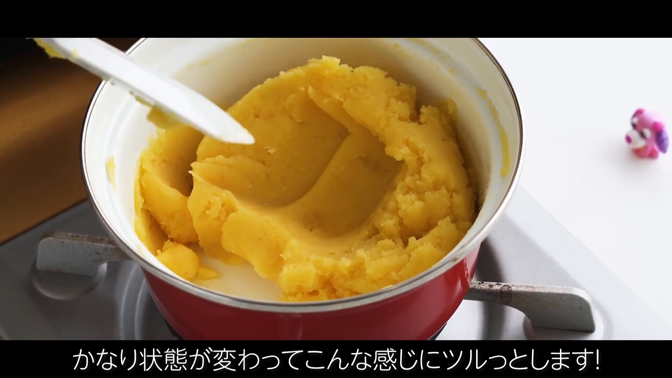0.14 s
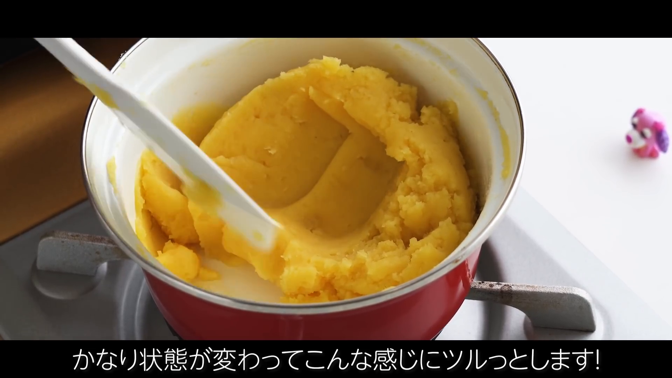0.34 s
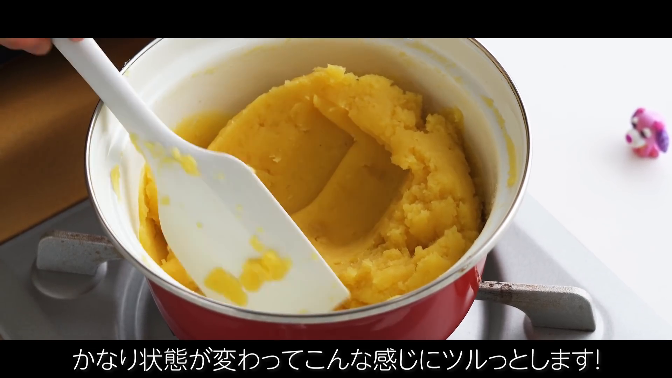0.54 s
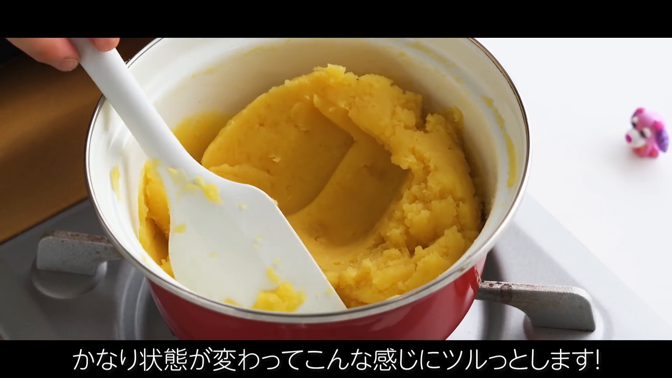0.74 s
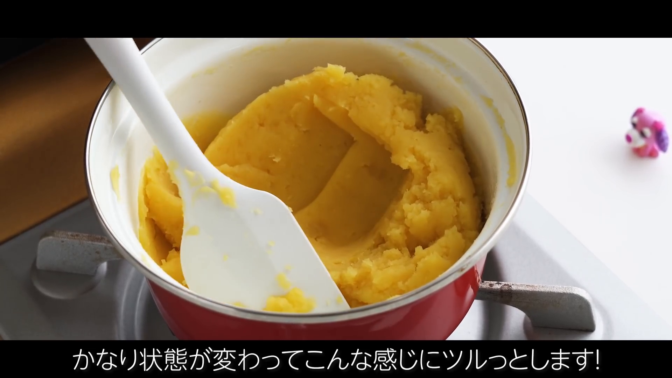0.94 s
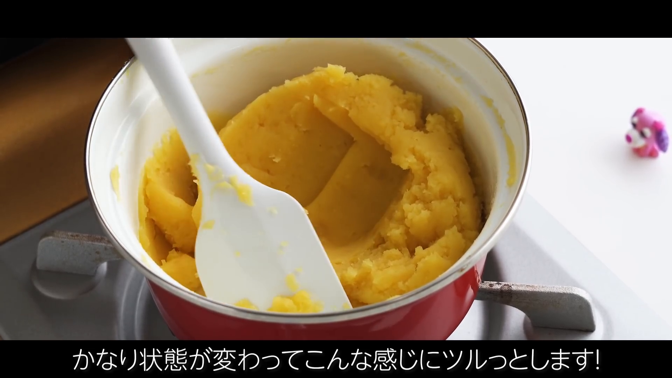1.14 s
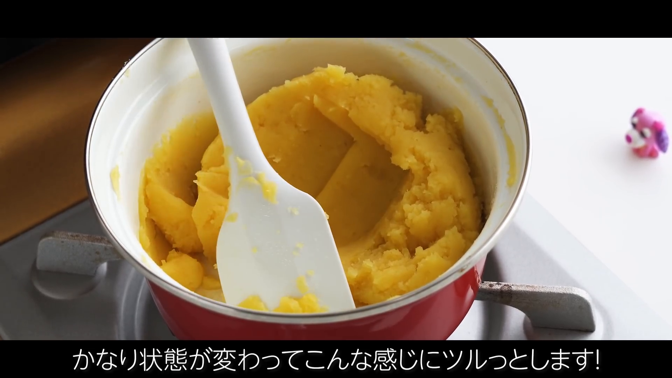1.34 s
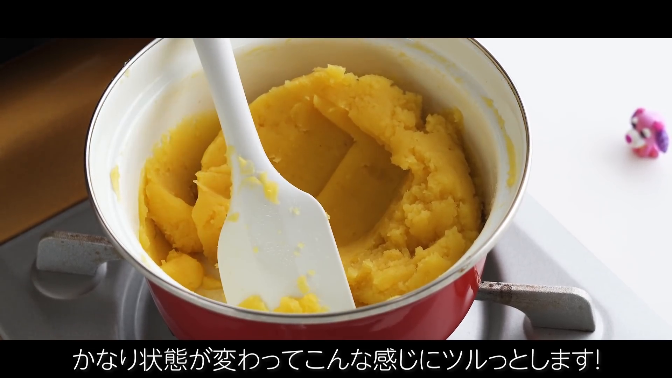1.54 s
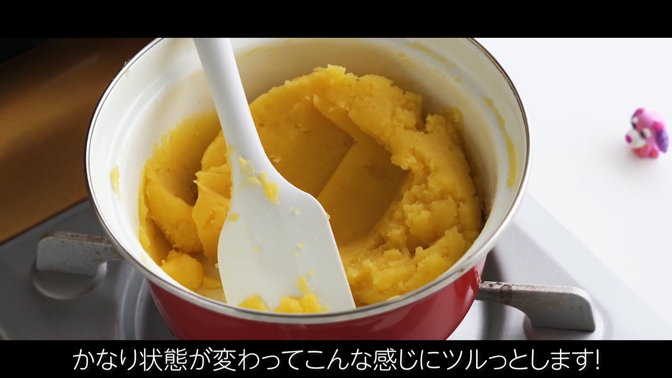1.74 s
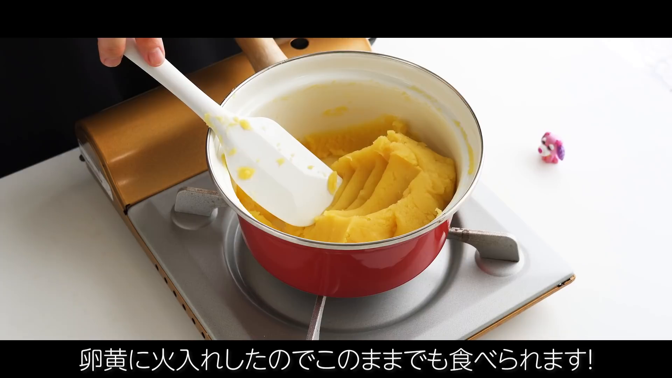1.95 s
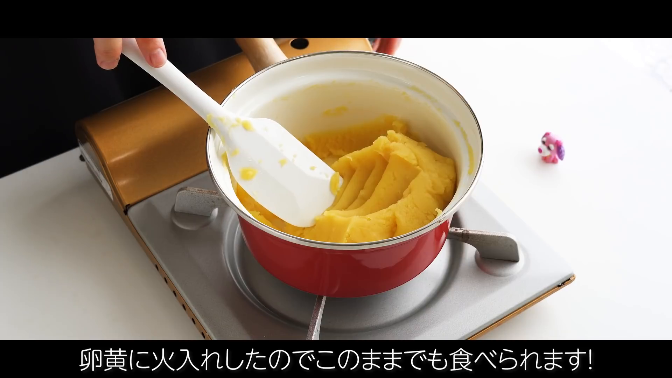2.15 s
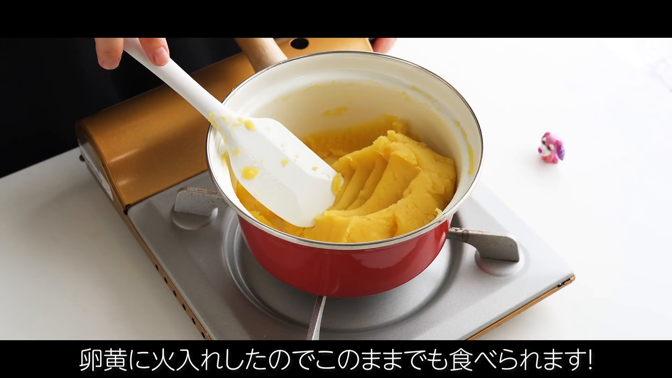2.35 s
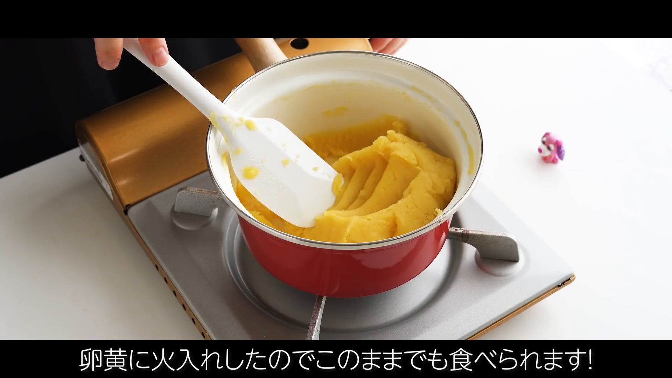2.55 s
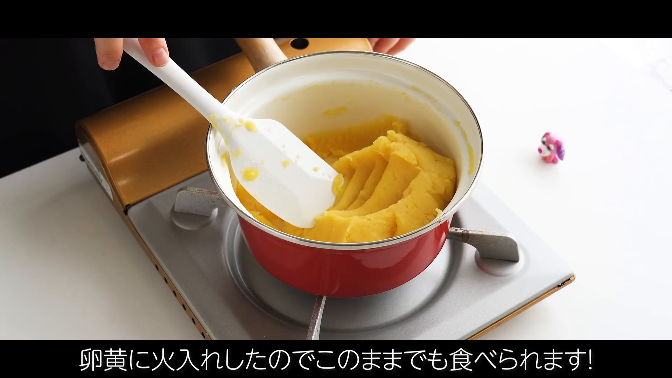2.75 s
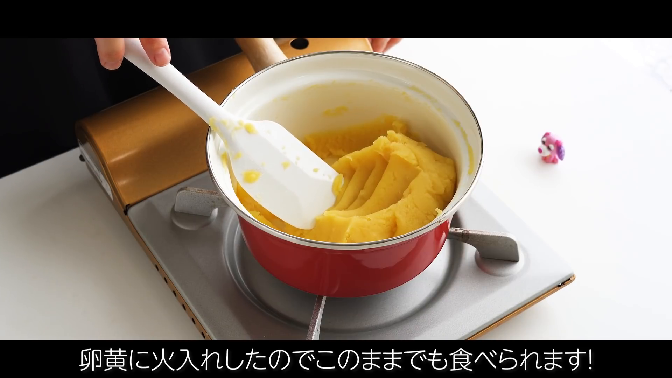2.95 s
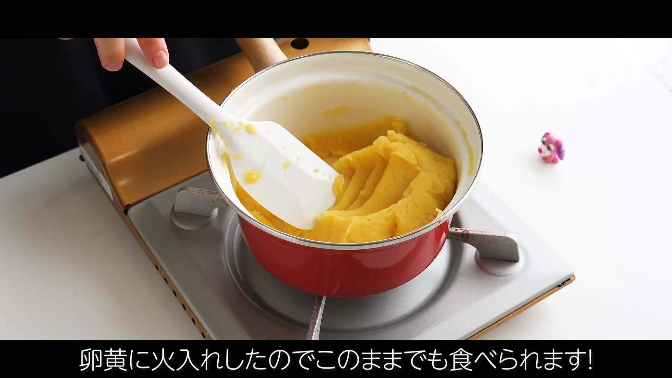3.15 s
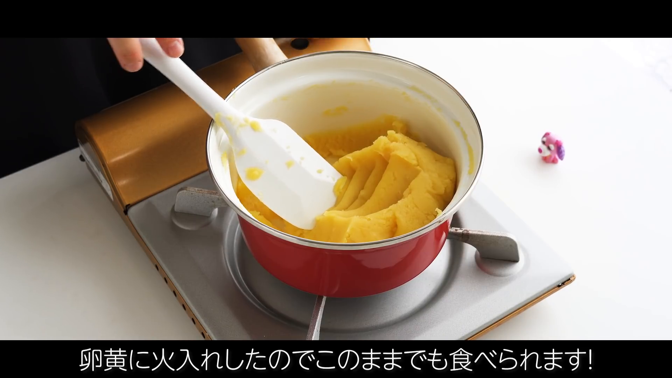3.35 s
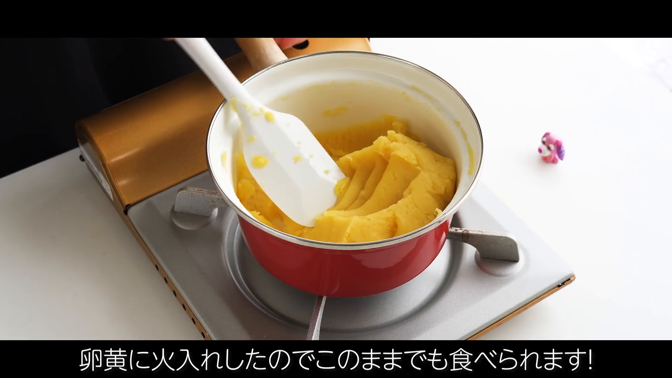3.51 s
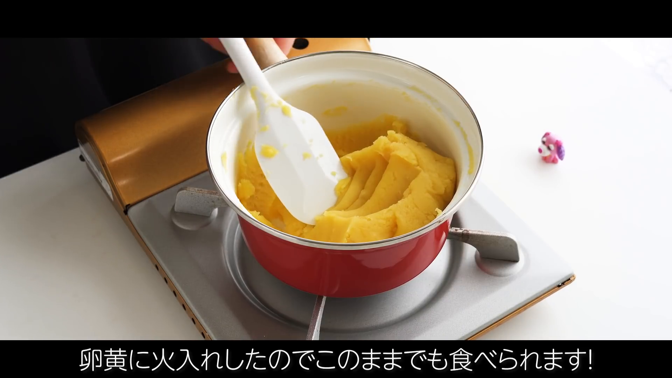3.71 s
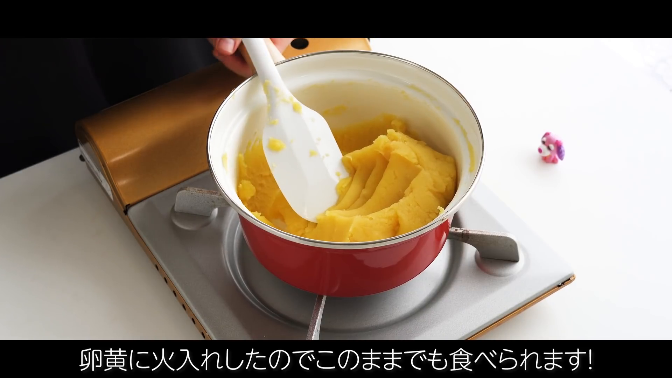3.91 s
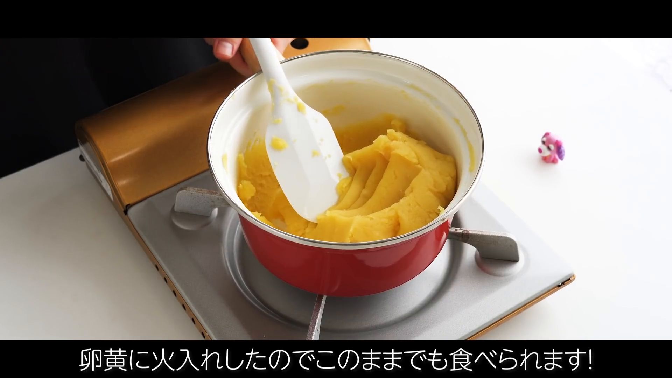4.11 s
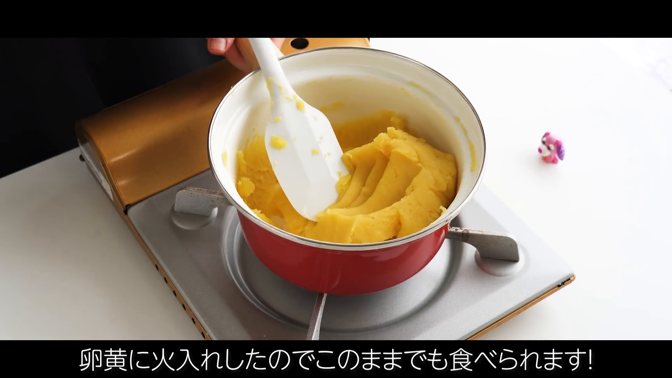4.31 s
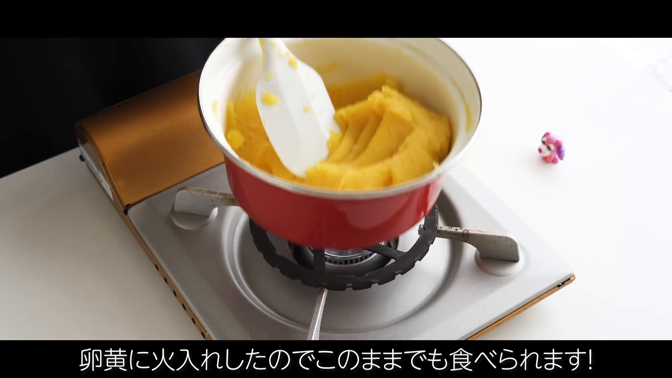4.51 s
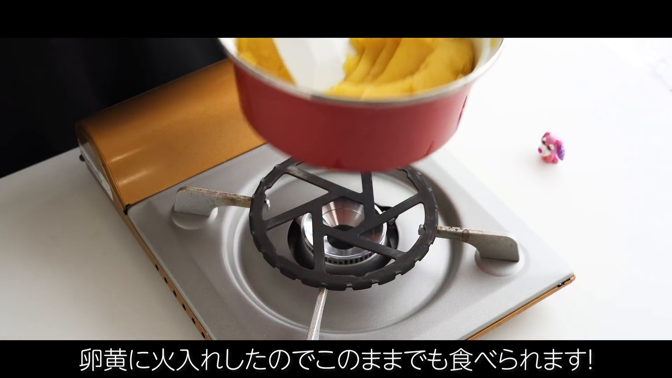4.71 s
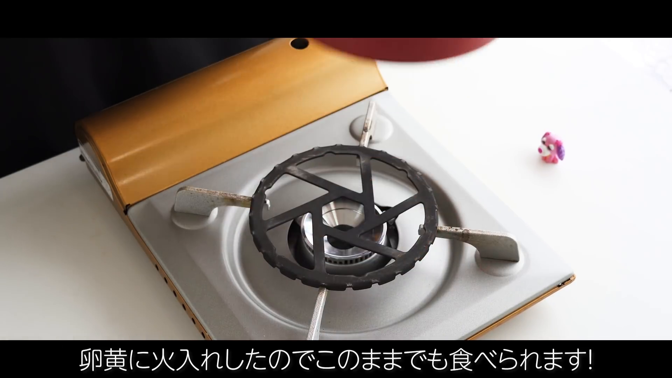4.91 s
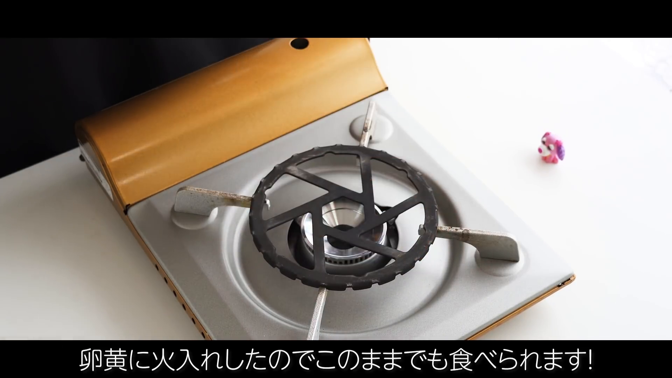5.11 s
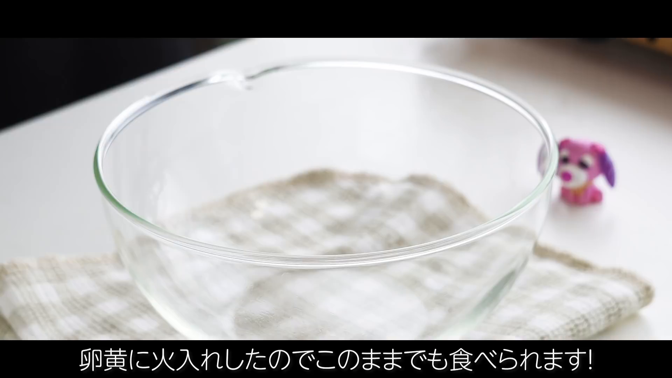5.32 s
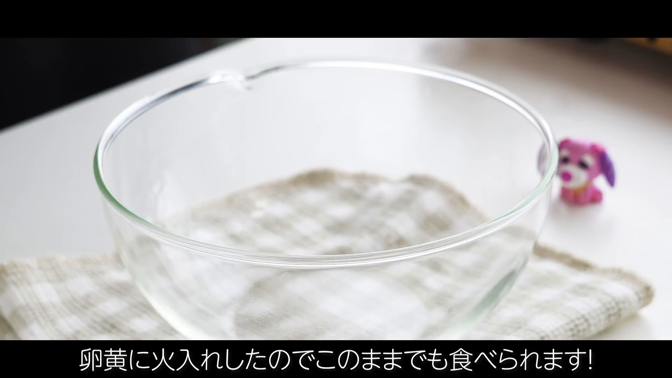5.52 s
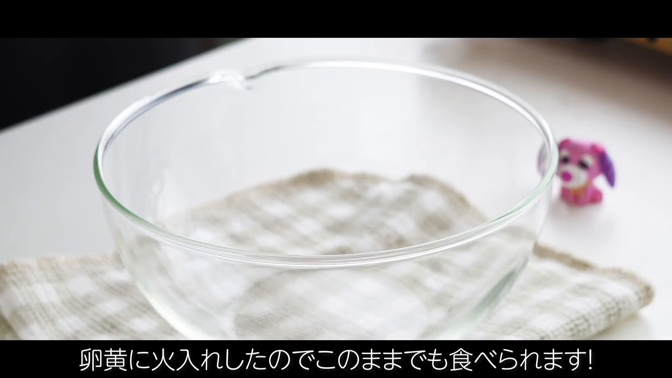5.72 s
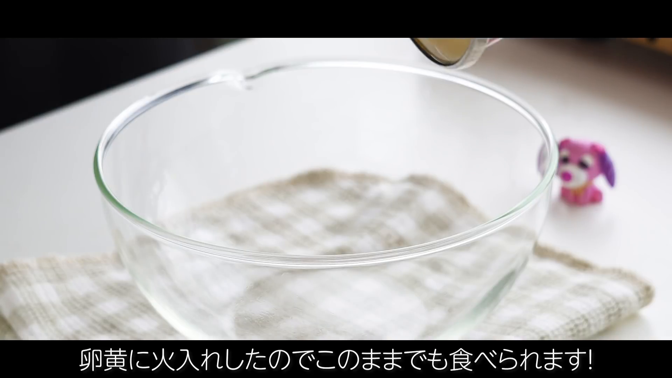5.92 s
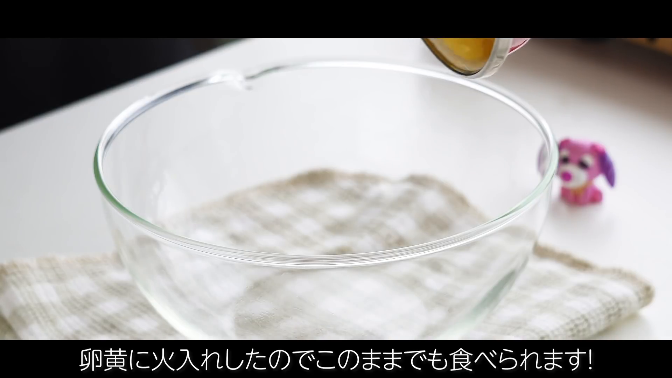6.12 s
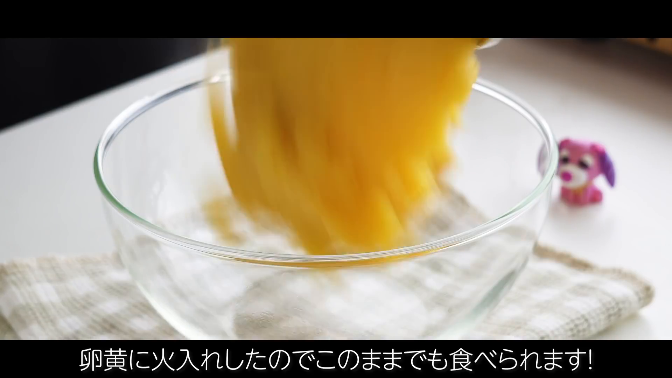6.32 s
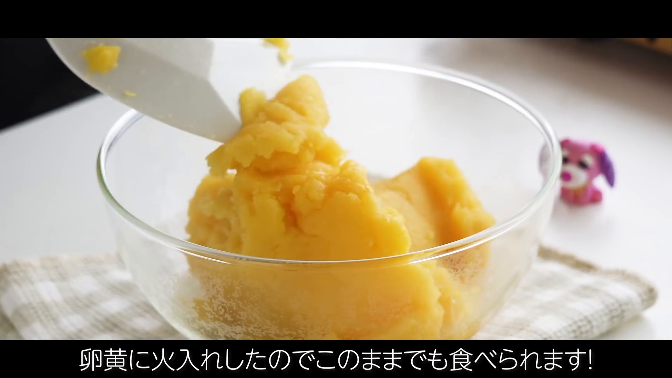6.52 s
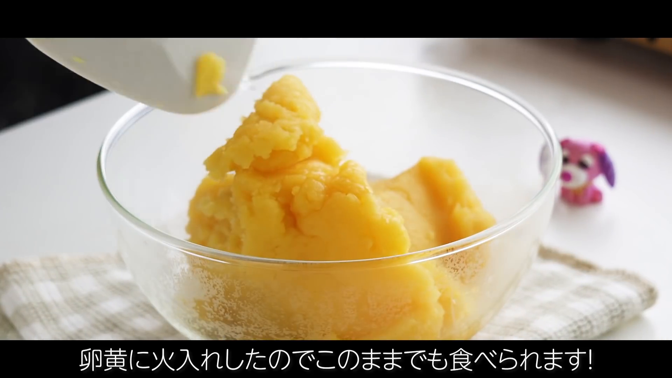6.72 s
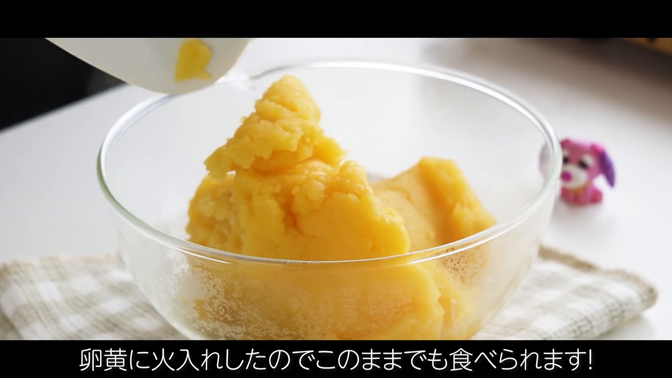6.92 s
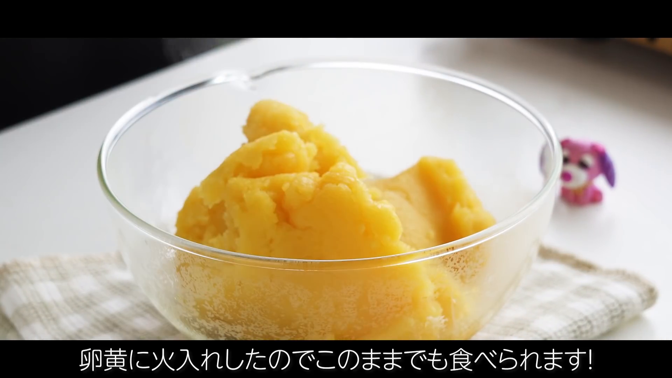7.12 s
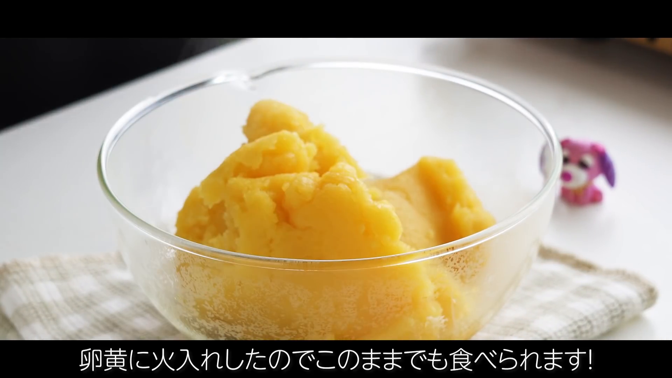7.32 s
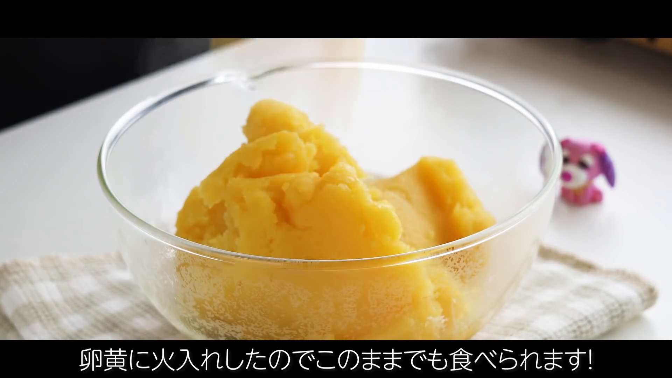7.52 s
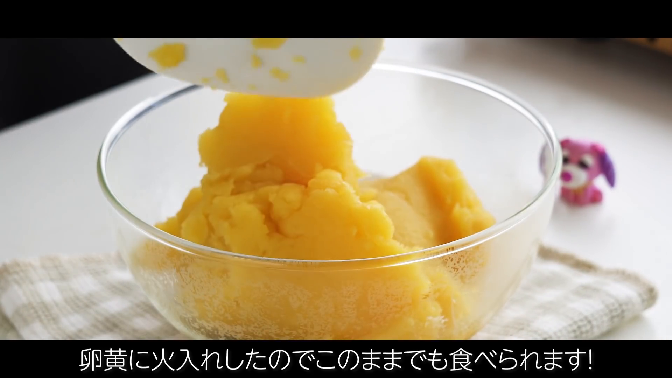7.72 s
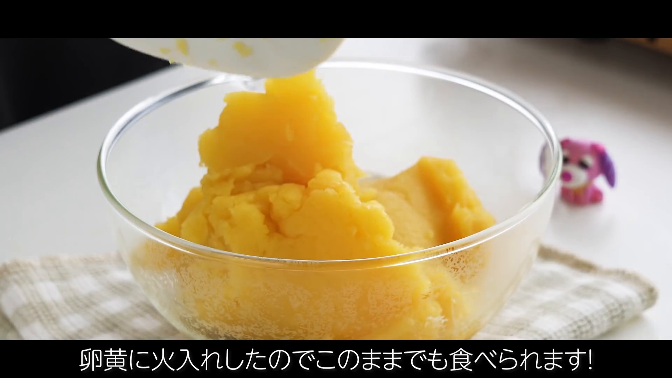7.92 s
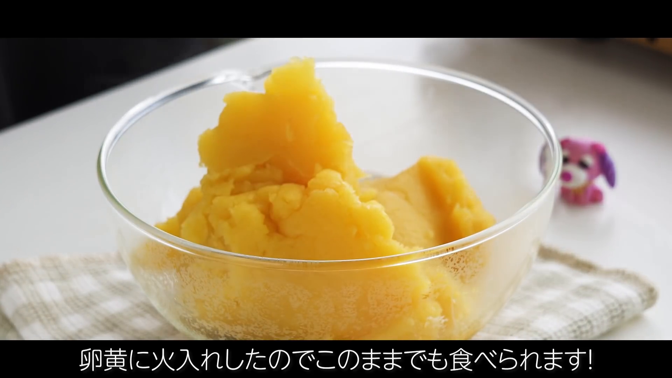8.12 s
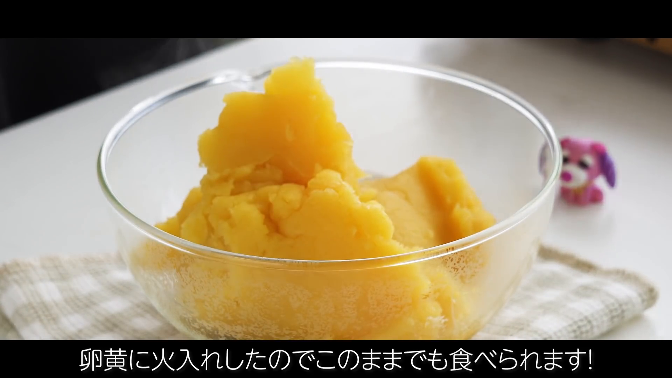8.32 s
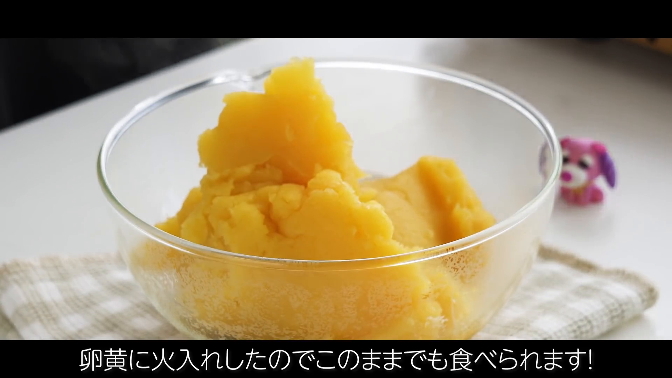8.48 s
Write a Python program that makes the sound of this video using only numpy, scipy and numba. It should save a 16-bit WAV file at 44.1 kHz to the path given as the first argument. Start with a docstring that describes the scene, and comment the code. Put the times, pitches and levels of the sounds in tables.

```python
"""Kitchen table, one channel, three set-ups joined by hard cuts over a quiet kitchen's hum and hiss.
Near the pot first: hot paste sizzles as dense noise grains, a spatula scrapes in duller grains, a few knocks
sound. Then wider: steam pops stand out, knocks rattle as noise and ring the pot's sine modes on its trivet; the
pot is lifted away and its wall shades the treble. Last, at the glass bowl: paste is pushed out with short sticky
noise bursts, then a lump lands with a squelch, slap and thump, and the spatula brushes the heap."""
import sys
import numpy as np
from scipy import signal
from scipy.fft import rfft, irfft, next_fast_len
from scipy.io import wavfile
from scipy.ndimage import uniform_filter1d
from numba import njit

SR = 44100
rng = np.random.default_rng(int(sys.argv[2]) if len(sys.argv) > 2 else 0)


def file_out(sig):
    """Save sig as 16-bit WAV at sys.argv[1]."""
    # one column per channel
    cols = np.atleast_2d(sig).T
    # limit, then scale
    lim = np.clip(cols, -1, 1)
    pcm = np.round(lim * 32767).astype(np.int16)
    wavfile.write(sys.argv[1], SR, pcm)


N = 377055

# start of each of the three set-ups, and the end: [t/s]
SETUP_TIMES = [0, 1.95, 5.352, 8.55]

# sizzle colour close to the pot: [f/Hz, relative level/dB per Hz]
NEAR_SIZZLE_COLOUR = [(180, -57), (300, -27), (420, -11), (488, -19), (522, -26), (577, -6), (660, -3),
                      (938, -1.5), (1290, -8), (2790, -7), (3840, -2.5), (7890, -16), (14700, -18.5),
                      (15700, -15), (16500, -34)]
# sizzle colour from further off: [f/Hz, relative level/dB per Hz]
WIDE_SIZZLE_COLOUR = [(180, -40), (300, 4), (392, -8), (441, -4.5), (607, -6), (938, -2), (1190, -7),
                      (1290, -4.5), (1830, -8), (2930, 0.5), (6560, -10), (10500, -13), (14200, -9.5),
                      (15700, -9), (16500, -31)]
# loudest steam pops: [t/s, level/dB, centre f/Hz]
STEAM_POPS = [(2.732, -47, 2920), (2.7771, -43, 3750), (2.955, -39, 3260), (2.984, -37, 3000),
              (3.754, -37.5, 2850), (3.918, -38.5, 2980), (4.0028, -37, 4000), (4.181, -46, 2850),
              (4.7142, -40, 3450), (5.0413, -40, 3010), (5.076, -37, 2950), (5.15, -38.5, 3600),
              (5.168, -41, 3400), (5.267, -33.5, 3940)]
# sizzle (before its filters) and pot-mouth resonance, near and wide set-up: [level/dB]
SIZZLE_DB, MOUTH_DB = [-50.5, -50], [-82, -65.5]
# the pot is carried off from LIFT_S and its wall hides more and more of the treble
LIFT_S, OPEN_HZ, SHADE_HZ_PER_S = 4.79, 17300, 14400

# dull grains: spatula scrape, swelling at 2.91 and 3.18 s as tails of the knocks; one path for each of
# the first two set-ups: [t/s, level/dB before it wavers]
DULL_GRAIN_PATHS = [
    [(0.0, -64), (0.362, -68), (0.558, -55.5), (1.02, -70.5), (1.95, -65)],
    [(1.95, -53), (2.58, -56), (2.91, -46.5), (3.02, -59), (3.18, -42), (3.29, -56.5), (3.42, -57.5),
     (3.69, -54), (4.18, -57), (5.19, -55), (5.352, -58.5)],
]

# modes of the loaded pot on trivet and stove: [f/Hz, relative level/dB, t60/s]
POT_MODES = [(108, -2, .2), (188, 2, .2), (205, 0, .25), (324, -4, .25), (367, 2, .45), (446, 2, .32),
             (600, -6, .13), (635, -4, .25), (708, -2, .2), (820, -4, .18), (960, -3, .12), (996, -4, .18),
             (1108, 0, .16), (1175, -6, .3), (1235, -1.5, .34), (1255, -5, .3), (1340, -6, .24),
             (1385, -10, .2), (1755, -10, .2), (1845, -8, .2), (2005, -8, .18), (2075, -8, .13),
             (2190, -8, .13), (2420, -8, .18)]
# knocks of pot on trivet: [t/s, clank level/dB, clank f/Hz, thud level/dB, thud f/Hz, crack level/dB,
# crack f/Hz, fizz level/dB, factor on each mode's ring time: below 1 shorter, above 1 longer]
TRIVET_KNOCKS = [(0.19, -77, 1260, -63.5, 331, -64, 3250, -60, 0.48),
                 (0.622, -47, 684, -40.5, 199, -43, 1600, -64, 1.16),
                 (0.643, -44.5, 644, -49.5, 398, -51, 3700, -62, 0.9),
                 (1.857, -68, 719, -60, 443, -49, 3540, -58, 0.74),
                 (2.213, -44.5, 1180, -50.5, 361, -40.5, 4550, -57, 0.27),
                 (2.307, -65, 999, -56, 215, -49, 2270, -60, .7),
                 (2.389, -45.5, 1110, -68, 296, -52, 2250, -53, 0.7),
                 (2.43, -35, 1220, -52.5, 443, -41, 2190, -51, 0.61),
                 (2.459, -38.5, 1180, -50, 237, -48, 3220, -59, 0.39),
                 (2.538, -38, 960, -69, 153, -46, 2220, -61, 0.51),
                 (2.589, -39.5, 1250, -49, 450, -45, 3490, -59, 0.82),
                 (2.652, -32, 1070, -45, 464, -36, 2300, -54, 0.63),
                 (2.797, -43.5, 830, -55.5, 178, -44.5, 3150, -53, 0.78),
                 (2.857, -37.5, 970, -55.5, 186, -24.5, 3270, -31.5, 0.65),
                 (2.897, -32.5, 900, -43.5, 317, -27.5, 3230, -41, 0.51),
                 (3.085, -45, 1000, -51, 183, -31, 2440, -26, 0.84),
                 (3.104, -36, 980, -50.5, 498, -34.5, 2300, -54, 0.56),
                 (3.127, -25, 1220, -48.5, 474, -21, 3400, -46, 0.88),
                 (3.149, -26.5, 1270, -41.5, 474, -24, 2580, -46, 0.81),
                 (3.351, -28, 850, -36, 220, -37, 2880, -39.5, 0.93),
                 (3.374, -44, 710, -39.5, 302, -52, 2990, -39.5, 0.88),
                 (3.442, -42.5, 725, -57, 371, -39.5, 3020, -51, 0.53),
                 (4.284, -53, 848, -46, 194, -58, 2900, -68, 0.67),
                 (4.317, -53.5, 1180, -47, 308, -64, 3300, -58, 0.58),
                 (4.834, -54, 1500, -64, 205, -49, 2370, -54, 0.49),
                 (4.885, -53, 1500, -61, 220, -49, 2200, -58, 0.54),
                 (4.973, -52, 719, -54, 221, -47, 3140, -51, 0.49)]
# of the clank; crack and fizz scale from both, the thud only in its decay
RATTLE_T60_S, KNOCK_RISE_S = 0.08, 0.0022
RING_DB, CLANK_OCTAVES = -3, 0.7  # clank ring against its rattle; reach of the blow over the modes

# wet smacks of paste letting go or landing: [t/s, snap level/dB, snap f/Hz, low level/dB, low f/Hz,
# treble level/dB]
PASTE_SMACKS = [(5.3695, -45, 4190, -52, 1950, -63), (5.474, -55, 3670, -51, 1830, -66),
                (5.701, -48, 3820, -69, 810, -55), (5.7124, -60, 3930, -68, 1390, -54),
                (5.7428, -41.5, 4060, -65, 869, -53), (5.751, -48, 4300, -66, 703, -48),
                (5.877, -45.5, 3800, -53, 1840, -53), (5.975, -48.5, 3830, -69, 1580, -57),
                (5.987, -56, 4010, -71, 1020, -50), (6.0729, -35, 3650, -48, 1850, -54),
                (6.109, -52, 3980, -52, 1940, -53), (6.1863, -49, 4360, -58, 1590, -50),
                (6.196, -46, 3910, -53, 1710, -45), (6.206, -44, 4340, -49, 1640, -61),
                (6.2881, -52, 3960, -69, 1880, -71), (6.3973, -42, 4050, -46, 2300, -46),
                (6.455, -37, 3820, -39, 1270, -46), (6.4603, -18, 3560, -28, 1280, -37),
                (6.4744, -18.5, 3380, -18.5, 1380, -32), (6.4808, -28, 3750, -37, 2290, -39),
                (6.5027, -43, 3840, -26.5, 820, -49), (6.5614, -50, 3530, -41, 993, -58),
                (6.5859, -49, 2550, -43, 1300, -63), (6.6105, -49, 4000, -41, 1050, -55),
                (6.6353, -53, 3520, -50, 1610, -57), (6.6404, -48, 4060, -42, 985, -53),
                (6.775, -46, 4800, -44.5, 1320, -62), (7.0394, -57, 4820, -53, 797, -66),
                (7.6265, -48, 3170, -47, 1280, -58), (7.645, -51, 3680, -47, 1750, -47),
                (7.7056, -46, 2900, -32, 1250, -46)]
SMACK_T60_S, SMACK_RISE_S, SMACK_TREBLE_HZ = 0.017, 0.002, 7760
# faint smacks strewn between the loud ones: window, lower level and factor for the louder ones
CRACKLE_START_S, CRACKLE_END_S, CRACKLE_BASE_DB, CRACKLE_SPREAD = 5.6, 6.7, -66, 4.5
# the lump lands, spreads in the bowl, then settles
LAND_S, SPREAD_S, LAND_RISE_DB_S = 6.46, 0.056, 900
SPREAD_FALL_DB_S, SQUELCH_SETTLE_DB_S, SETTLE_DB_S = 71, 128, 257
SQUELCH_DB, SLAP_DB, THUMP_DB, DEEP_THUMP_DB = -41, -39, -38, -56
# wet hiss dies after the cut, swells as the lump tears loose and as the spatula brushes the heap:
# [peak t/s, level around 4 kHz/dB, treble level/dB, rise/dB per s, fall/dB per s]
WET_HISS_SWELLS = [(5.352, -75, -78, 904, 86), (6.4, -59.5, -58.5, 130, 70), (7.63, -63.5, -66, 293, 200)]
# steady wet hiss while paste leaves the pot: [level/dB]
FIZZ_FLOOR_DB, TREBLE_FLOOR_DB = -74, -75

ROOM_T60_S, ROOM_DB = 0.22, -10
# kitchen hum and microphone hiss: [f/Hz, relative level/dB per Hz]
KITCHEN_COLOUR = [(15, -42), (25, -16), (80, -9), (111, -5.5), (172, -7), (226, 1), (273, -14),
                  (553, -22.5), (600, -25), (669, -23), (726, -25), (979, -26), (2460, -31), (14400, -37),
                  (16500, -39.5)]
# upper part of the kitchen noise in each set-up: [level/dB]
SETUP_HISS_DB = [-69.5, -63, -64]
# steady lowest part of the hum in each set-up: [level/dB]
SETUP_DEEP_DB = [-80, -72.5, -74.5]
# hum near 220 Hz and rumble under 140 Hz in each set-up, before they waver: [level/dB]
HUM_DB, RUMBLE_DB = [-70, -57, -61], [-77, -68, -67]
# hands bump pot and table: [t/s, rumble level/dB, hum level/dB before it wavers]
HAND_BUMPS = [(0.418, -59.5, -66), (0.615, -51, -50.5), (1.551, -76, -64.5), (1.769, -77, -67),
              (2.224, -58, -72), (2.92, -46.5, -51), (3.13, -54.5, -51), (3.37, -48.5, -48),
              (3.65, -56, -59), (4.01, -64, -57), (4.17, -58, -55), (4.34, -51.5, -49), (4.44, -55.5, -59),
              (4.81, -64, -62), (4.97, -72, -49), (5.12, -59, -53), (5.442, -67, -53), (6.62, -67, -47.5),
              (6.78, -71, -47.5), (6.964, -70, -55), (7.3, -68, -60), (7.63, -58, -68)]
BUMP_RISE_DB_S, BUMP_FALL_DB_S = 143, 132
TOP_HZ = 15850  # upper edge of the recorder's band


def sizzle():
    """Steam under the paste bursts in dense grains, resonates in the pot mouth and pops at times."""
    t = np.arange(N) / SR
    steam = grains(2500, 2.9, 0.94)
    near = colour(steam, NEAR_SIZZLE_COLOUR)
    wide = colour(steam, WIDE_SIZZLE_COLOUR)
    fry = np.where(t < SETUP_TIMES[1], near, wide)
    fry = butter_filter(fry, 2, 1600, "high")
    edge_hz = np.clip(OPEN_HZ - SHADE_HZ_PER_S * np.maximum(t - LIFT_S, 0), 3000, .4 * SR)
    fry = shade(shade(fry, edge_hz), 1.2 * edge_hz)
    out = fry * by_setup(SIZZLE_DB) * undb(0.82 * walk(14))
    mouth = unit(band(steam, 3430, 4530))
    out += mouth * by_setup(MOUTH_DB) * undb(4.0 * walk(4.24))
    for s, db, hz in STEAM_POPS:
        add(out, s, undb(db) * burst(0.61 * hz, 1.26 * hz, 0.01))
    return out


def dull_grains():
    """Sparser grains in a dull band: the spatula scrapes the pot floor, and knocks leave grainy tails."""
    t = np.arange(N) / SR
    dull = colour(grains(700, 3, 2.0), WIDE_SIZZLE_COLOUR)
    dull = unit(band(dull, 315, 1800))
    gain = np.zeros(N)
    for path in DULL_GRAIN_PATHS:
        s, db = np.transpose(path)
        gain += undb(np.interp(t, s, db)) * ((t >= s[0]) & (t <= s[-1]))
    return dull * gain * undb(0.56 * walk(4.7))


def knocks():
    """Each knock rattles briefly and rings the pot; the thud rings its low modes."""
    out, t = np.zeros(N), np.arange(13230) / SR
    t60, rise_s = RATTLE_T60_S, KNOCK_RISE_S
    clank_rise = np.minimum(t / rise_s, 1)
    thud_rise = np.minimum(t / 0.011, 1)
    for s, clank_db, clank_hz, thud_db, thud_hz, crack_db, crack_hz, fizz_db, ring_factor in TRIVET_KNOCKS:
        rattle = burst(0.51 * clank_hz, 1.7 * clank_hz, t60, 4.1, rise_s)
        clank_ring = clank_rise * ring(clank_hz, CLANK_OCTAVES, ring_factor, t)
        add(out, s, undb(clank_db) * (rattle + undb(RING_DB) * clank_ring))
        thud = burst(113, 560, 1.83 * t60, 0.98, 0.0017)
        thud_ring = thud_rise * ring(thud_hz, 0.61, ring_factor, t)
        add(out, s, undb(thud_db) * (thud + undb(4.0) * thud_ring))
        crack = burst(0.69 * crack_hz, 1.44 * crack_hz, 0.68 * t60, 4.2, rise_s)
        add(out, s, undb(crack_db) * crack)
        fizz = burst(5300, 20000, 0.47 * t60, 2.3, 0.37 * rise_s)
        add(out, s, undb(fizz_db) * fizz)
    return out


def ring(centre_hz, octaves, ring_factor, t):
    """The modes near the struck pitch speak loudest; every blow mixes them anew."""
    hz, db, t60 = np.transpose(POT_MODES)[:, :, None]
    level_chance, tuning_chance, phase_chance = rng.standard_normal((3, len(POT_MODES), 1))
    db = db - 12 * (np.log2(hz / centre_hz) / octaves) ** 2 + 2.5 * level_chance
    decay = undb(db - 60 * t / (ring_factor * t60))
    tuned_hz = hz * (1 + 0.0013 * tuning_chance)
    return (decay * np.sin(2 * np.pi * tuned_hz * t + 2 * phase_chance)).sum(axis=0)


def paste_smacks():
    """Sticky paste tears or lands in short wet smacks, with fainter ones crackling at random between."""
    out = np.zeros(N)
    for s, *parts in PASTE_SMACKS:
        add(out, s, smack(*parts))
    for when, size, pitch in rng.random(size=(36, 3)):
        s = CRACKLE_START_S + when * (CRACKLE_END_S - CRACKLE_START_S)
        db = CRACKLE_BASE_DB - CRACKLE_SPREAD * np.log(size + .05)
        add(out, s, smack(db, 3500 + 1200 * pitch, db - 12, 1500, db + 8 * (pitch - .5)))
    return out


def smack(snap_db, snap_hz, low_db, low_hz, treble_db):
    """One wet tear: a snap, a lower pat and a spit of treble."""
    parts = [(snap_db, 0.84 * snap_hz, 1.19 * snap_hz), (low_db, 0.4 * low_hz, 1.5 * low_hz),
             (treble_db, 0.46 * SMACK_TREBLE_HZ, 2.0 * SMACK_TREBLE_HZ)]
    return sum(undb(db) * burst(lo, hi, SMACK_T60_S, rise_s=SMACK_RISE_S, size=2700)
               for db, lo, hi in parts)


def lump_landing():
    """The lump hits the bowl: grainy squelch and slap, with noise thumps that hold while it spreads."""
    spread_over = np.maximum(np.arange(N) / SR - LAND_S - SPREAD_S, 0)
    squelch_gain = swell(LAND_S, LAND_RISE_DB_S, SPREAD_FALL_DB_S) * undb(-SQUELCH_SETTLE_DB_S * spread_over)
    body_gain = swell(LAND_S, LAND_RISE_DB_S, 5.0) * undb(-SETTLE_DB_S * spread_over)
    wet = grains(1200, 4.6, -1.6)
    squelch = unit(band(wet, 240, 3300)) * undb(SQUELCH_DB)
    slap = unit(band(wet, 97, 700)) * undb(SLAP_DB)
    thump = unit(band(rng.standard_normal(N), 94, 155)) * undb(THUMP_DB)
    deep_thump = unit(band(rng.standard_normal(N), 35, 80)) * undb(DEEP_THUMP_DB)
    return squelch * squelch_gain + (slap + thump + deep_thump) * body_gain


def wet_hiss():
    """The last sizzle of the paste: fine grains near 4 kHz and above, on a floor with slow swells."""
    t = np.arange(N) / SR
    leaving_pot = (t > SETUP_TIMES[2]) & (t < LAND_S)
    fizz_gain = undb(FIZZ_FLOOR_DB) * leaving_pot
    treble_gain = undb(TREBLE_FLOOR_DB) * leaving_pot
    for s, fizz_db, treble_db, rise_db_s, fall_db_s in WET_HISS_SWELLS:
        shape = swell(s, rise_db_s, fall_db_s)
        fizz_gain = fizz_gain + undb(fizz_db) * shape
        treble_gain = treble_gain + undb(treble_db) * shape
    steam = grains(1700, 4.2, 2.6)
    fizz = unit(band(steam, 3650, 4550, order=1))
    treble = unit(band(steam, 3600, 14000))
    return fizz * fizz_gain + treble * treble_gain


def room(source):
    """The walls answer after 4 ms with a dull, dense tail of decaying noise."""
    t = np.arange(int(.4 * SR)) / SR
    tail = band(rng.standard_normal(len(t)), 130, 8600, order=1) * undb(-60 * t / ROOM_T60_S) * (t > .004)
    return undb(ROOM_DB) * signal.fftconvolve(source, tail / np.sqrt(np.sum(tail ** 2)))[:N]


def kitchen():
    """One noise split in bands: wavering hum and rumble raised by bumps, steady deep part and hiss."""
    air = colour(rng.standard_normal(N), KITCHEN_COLOUR)
    hum_power = by_setup(HUM_DB) ** 2
    rumble_power = (by_setup(RUMBLE_DB) * undb(5 * walk(4.9))) ** 2
    for s, rumble_db, hum_db in HAND_BUMPS:
        bump = swell(s, BUMP_RISE_DB_S, BUMP_FALL_DB_S)
        hum_power = hum_power + (undb(hum_db) * bump) ** 2
        rumble_power = rumble_power + (undb(rumble_db) * bump) ** 2
    hum = unit(band(air, 164, 323, order=3)) * np.sqrt(hum_power) * undb(3.1 * walk(10))
    rumble = unit(band(air, 85, 144, order=3)) * np.sqrt(rumble_power)
    deep = unit(butter_filter(air, 4, 140, "low")) * by_setup(SETUP_DEEP_DB)
    hiss = unit(butter_filter(air, 4, 350, "high")) * by_setup(SETUP_HISS_DB)
    return hum + rumble + deep + hiss


def grains(rate, spread_db, wash_db):
    """Tiny noise bursts, rate per second, of very unequal size over a smooth wash."""
    sizes = undb(spread_db * np.minimum(rng.exponential(size=N), 5))
    clicks = (rng.random(N) < rate / SR) * sizes
    smear = np.exp(-np.arange(80) / 20.0)
    bursts = unit(np.convolve(clicks, smear)[:N] * rng.standard_normal(N))
    return bursts + undb(wash_db) * rng.standard_normal(N)


def burst(lo_hz, hi_hz, t60, lumpy=0., rise_s=0.00014, size=13230):
    """Band noise of rms 1 under a fast rise and a decay; lumps are small bounces."""
    t = np.arange(size) / SR
    # a new random level every 90 samples, joined by ramps
    lumps = undb(lumpy * uniform_filter1d(np.repeat(rng.standard_normal(size // 90), 90), 90))
    shape = np.minimum(t / rise_s, 1) * undb(-60 * t / t60)
    return unit(band(rng.standard_normal(size), lo_hz, hi_hz)) * lumps * shape


def swell(s, rise_db_s, fall_db_s):
    """Gain that climbs to 1 at time s and falls away."""
    late = np.arange(N) / SR - s
    return undb(np.where(late < 0, rise_db_s, -fall_db_s) * late)


def walk(rate):
    """Slow random wander: levels held 1 / rate s and smoothed twice; spread about a third."""
    k = int(SR / rate)
    held = np.repeat(rng.standard_normal(N // k + 1), k)
    return 0.47 * uniform_filter1d(uniform_filter1d(held, k), k)[:N]


def by_setup(levels_db):
    """One gain for each set-up; silent where none is given."""
    gains = np.append(undb(levels_db), np.zeros(3))
    setup = np.searchsorted(SETUP_TIMES, np.arange(N) / SR) - 1
    return gains[np.clip(setup, 0, 2)]


@njit
def shade(x, hz):
    """State-variable low-pass with a moving edge."""
    y, b, l = np.empty(len(x)), 0., 0.  # b and l: band and low states
    for i in range(len(x)):
        g = np.tan(np.pi * hz[i] / SR)
        v = (b + g * (x[i] - l)) / (1 + g * (g + 1.4))
        y[i] = l + g * v
        b, l = 2 * v - b, l + 2 * g * v
    return y


def colour(x, points):
    """Shape the spectrum by (Hz, dB) points joined over log frequency; rms 1."""
    hz, db = np.transpose(points)
    size = next_fast_len(len(x))
    gain = undb(np.interp(np.log(np.fft.rfftfreq(size, 1 / SR) + 1), np.log(hz), db))
    return unit(irfft(rfft(x, size) * gain, size)[:len(x)])


def butter_filter(x, order, hz, kind):
    """Butterworth filter of the named kind."""
    return signal.sosfilt(signal.butter(order, hz, kind, fs=SR, output="sos"), x)


def band(x, lo_hz, hi_hz, order=2):
    """Butterworth band-pass."""
    return butter_filter(x, order, [lo_hz, min(hi_hz, .45 * SR)], "band")


def undb(db):
    """Decibels to gain."""
    return 10 ** (np.asarray(db) / 20)


def unit(x):
    """Scale to rms 1."""
    return x / np.sqrt(np.mean(x ** 2))


def add(out, s, x):
    """Mix x into out from time s."""
    i = int(s * SR)
    out[i:i + len(x)] += x[:N - i]


def scene():
    """Pot, spatula and paste over the kitchen; only knocks and wet paste excite the room."""
    metal = knocks()
    paste = paste_smacks() + lump_landing() + wet_hiss()
    reflections = room(metal + undb(-1.5) * paste)
    return (sizzle() + dull_grains() + metal + paste + reflections + kitchen())[None]


def record(dry):
    """The recorder cuts the top steeply."""
    return signal.sosfilt(signal.ellip(10, .2, 60, TOP_HZ, fs=SR, output="sos"), dry)


dry = scene()
out = record(dry)
file_out(out)
```